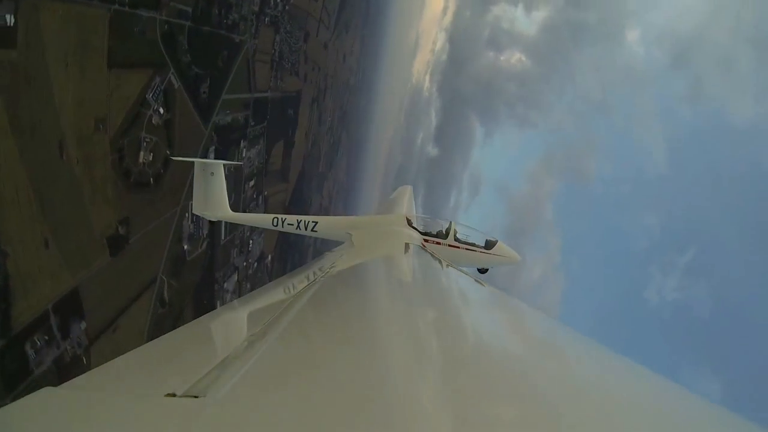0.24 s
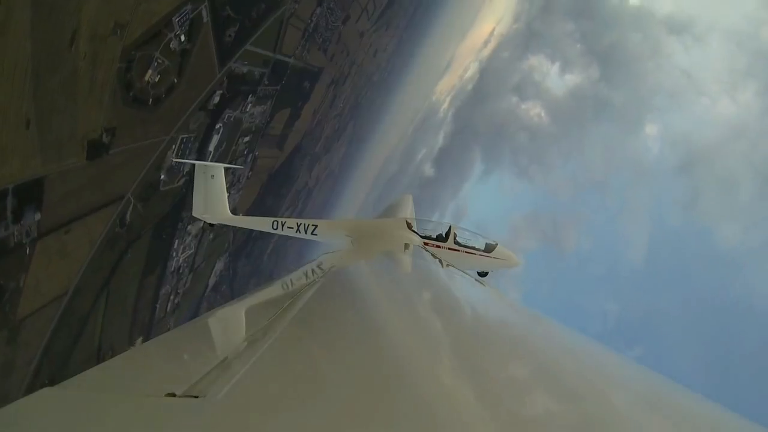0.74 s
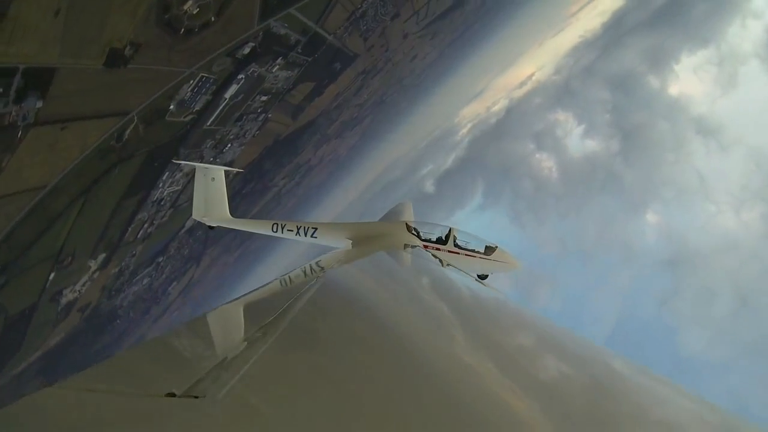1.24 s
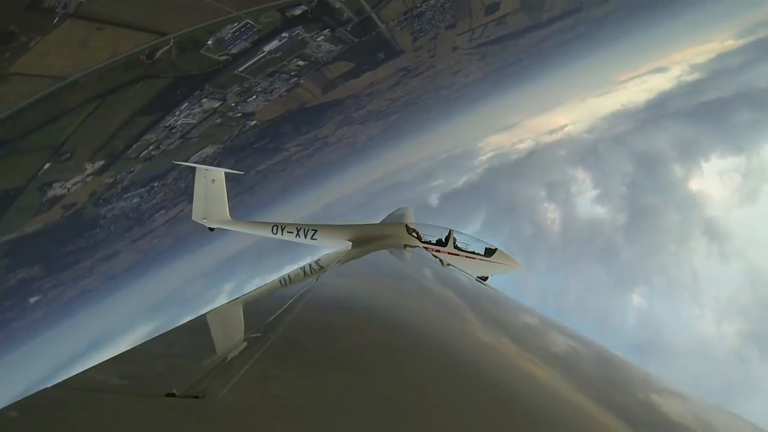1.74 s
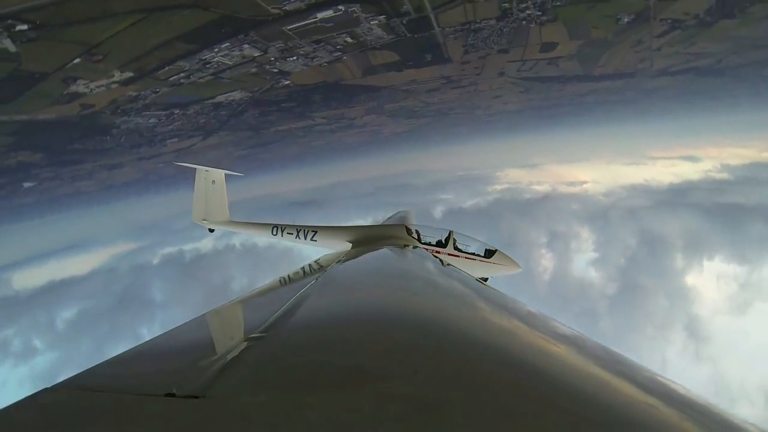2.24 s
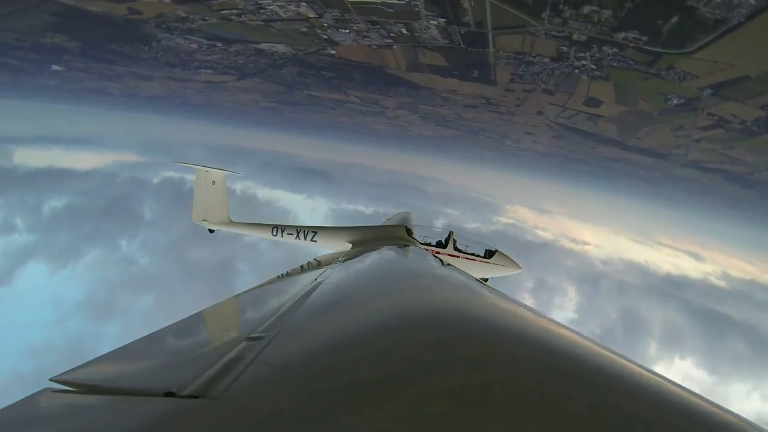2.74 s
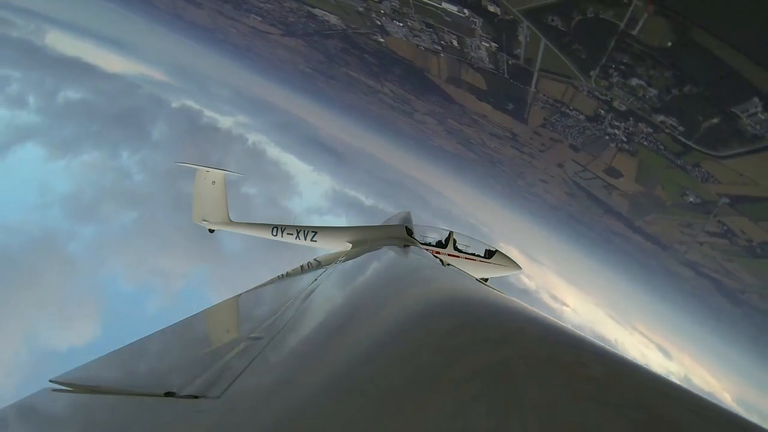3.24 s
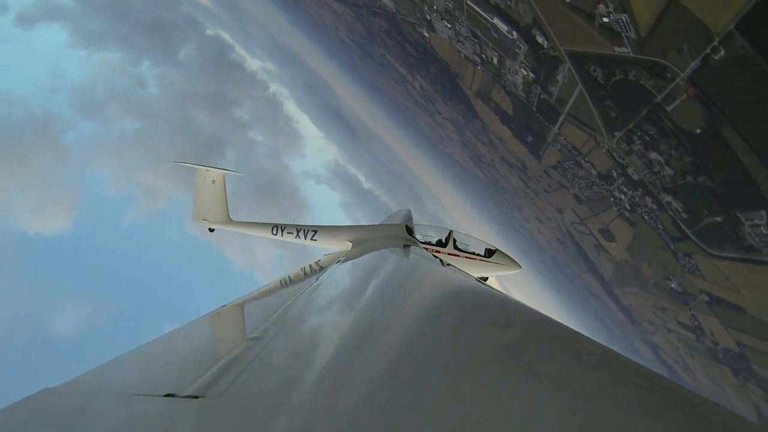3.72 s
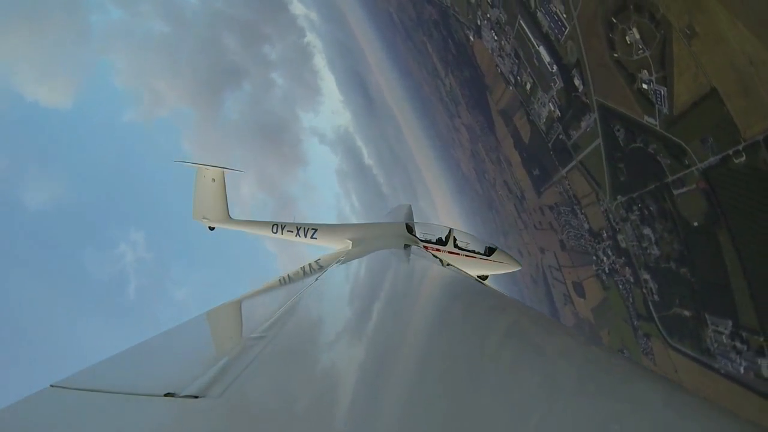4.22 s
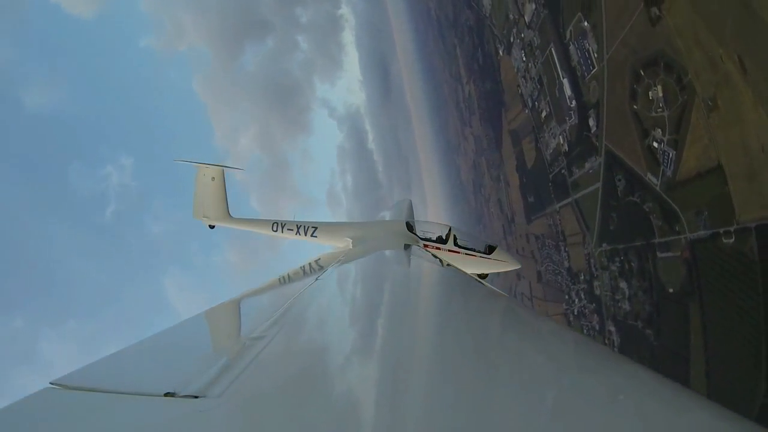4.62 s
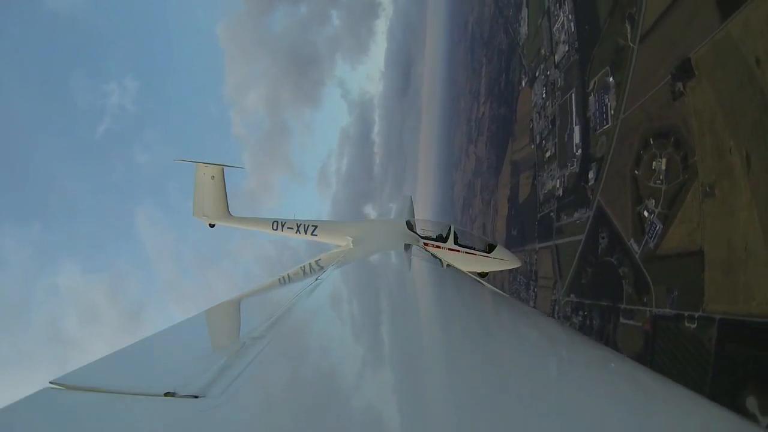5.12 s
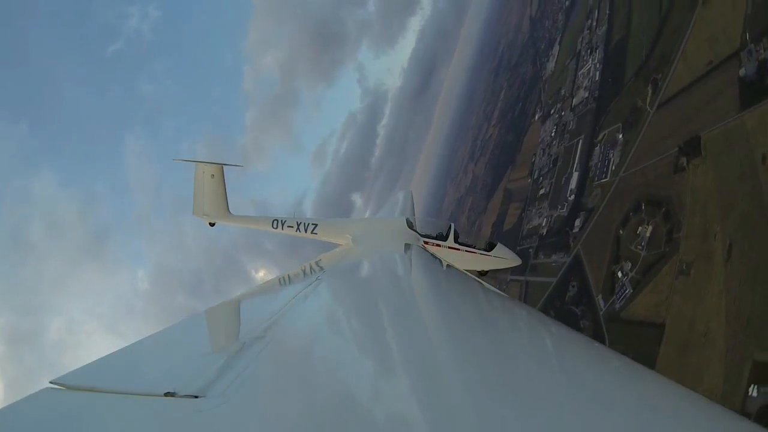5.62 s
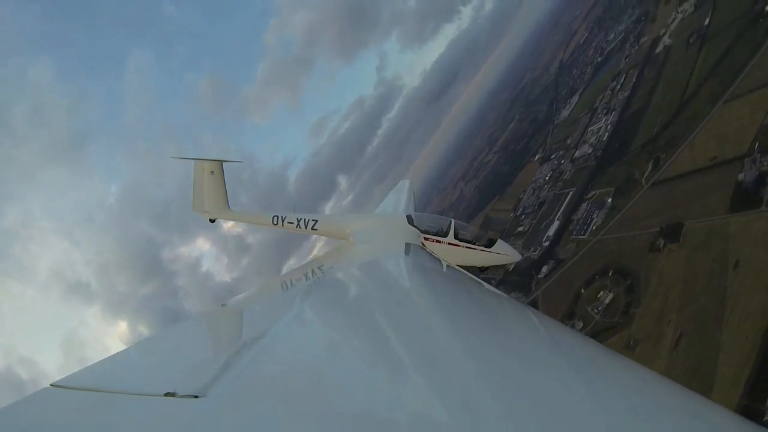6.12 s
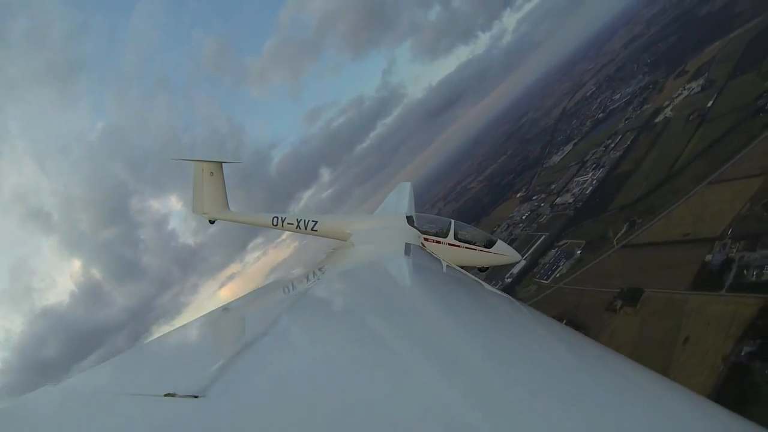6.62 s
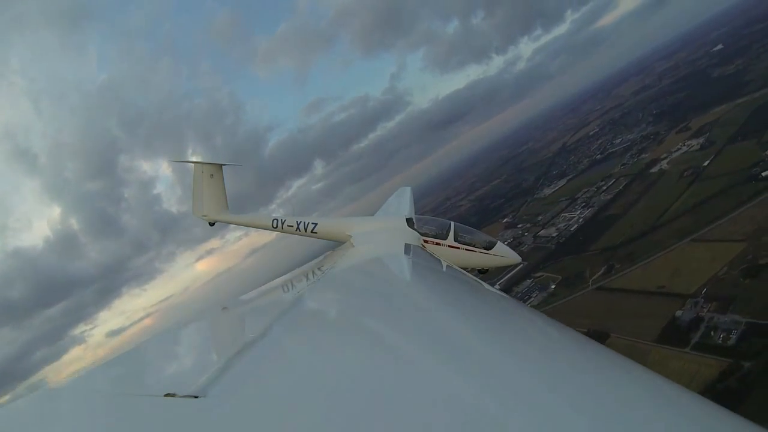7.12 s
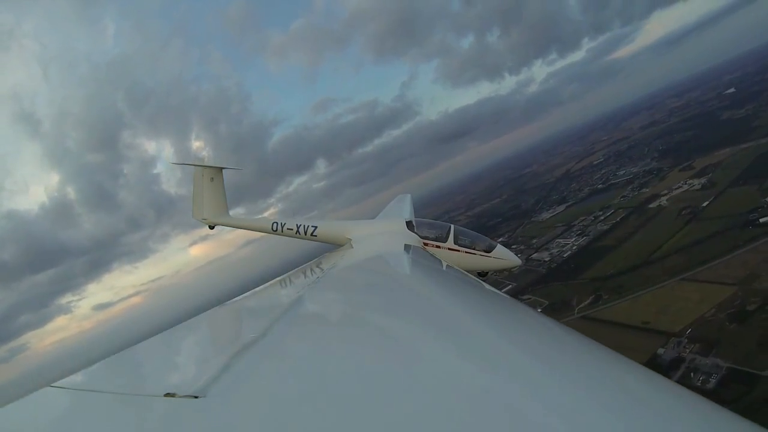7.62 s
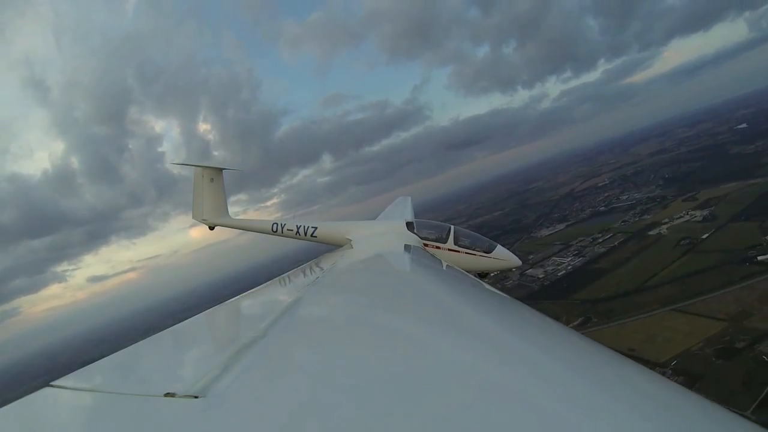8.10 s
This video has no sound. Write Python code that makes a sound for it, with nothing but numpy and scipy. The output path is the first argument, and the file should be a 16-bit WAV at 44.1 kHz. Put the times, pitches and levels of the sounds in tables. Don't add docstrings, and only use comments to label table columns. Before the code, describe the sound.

Close, mono, boxy airflow in open sky, with no engine and no room echo. A deep shuddering hum bumps unevenly beneath a muffled roar; a hollow, breathy mid tone thins early, then swells after four seconds. Bright hiss with very faint whistles dips around two seconds and grows fuller as the glider rolls level.

```python
import sys
import numpy as np
from scipy import signal
from scipy.fft import rfft, irfft, next_fast_len
from scipy.io import wavfile
from scipy.ndimage import map_coordinates

SR = 44100
rng = np.random.default_rng(int(sys.argv[2]) if len(sys.argv) > 2 else 0)


def how_loud(loudness_db):
    steps = np.asarray(loudness_db, float) / 20
    return 10 ** steps


def transcribe(u):
    v = np.clip(np.atleast_2d(u).T, -1, 1)
    q = np.round(v * 32767).astype(np.int16)
    wavfile.write(sys.argv[1], SR, q)


N = 368676

# rest level/dB, airspeed share/(dB per dB), sideslip share/(dB per dB)
LAYER_RULES = dict(first=(-25, -0.37, 0.25), second=(-31, -.2, 0.15), buffet=(-29.5, -0.23, 0.49),
               third=(-34.5, 0.25, 0.36), deep=(-30.5, 1.05, 0.09), roar=(-33.5, 0.65, 0.22),
               hiss=(-33, 1, 0.062), fine=(-48.5, 0.68, .3), thin=(-59, 0.64, .6))


def unit(x):
    return x / np.sqrt(np.mean(x ** 2) + 1e-20)


def along(points, hz):
    f, values = np.transpose(points)
    return np.interp(np.log(hz + 1), np.log(f + 1), values)


def curves(rows):
    times, *columns = np.transpose(rows)
    return [np.interp(np.arange(N) / SR, times, column) for column in columns]


def wobble(rate):
    knots = rng.standard_normal(400 + N // 100)
    return unit(map_coordinates(knots, [np.arange(N) * rate / SR]))


def peak(f, hz, width):
    damping = (f * width) ** 2
    return damping / ((hz * hz - f * f) ** 2 + damping)


def above(f, hz):
    return 1 / (1 + (hz / (f + 1)) ** 16)


def noise(power):
    m = next_fast_len(N + 8192)
    gain = np.sqrt(power(np.fft.rfftfreq(m, 1 / SR)))
    spectrum = rfft(rng.standard_normal(m)) * gain
    return unit(irfft(spectrum, m)[:N])


def level(rest_db, by_speed, by_slip, lead_s=0):
    # t/s, level/dB
    airspeed = [(0, 0.5), (.2, -1), (1.1, -3), (1.7, -6), (1.95, -3.5), (2.5, -5.5), (3.3, -4.5), (4, -0.5),
                (4.7, -0.5), (5.3, 2.5), (6.1, 3), (6.9, 4.5), (7.4, 4.5), (7.95, 4), (8.36, 5)]
    # t/s, level/dB
    sideslip = [(0, 3), (0.379, -1.5), (.6, 1.5), (1.35, 0), (1.7, -1.5), (2.3, -2), (2.7, -3.5), (3.3, -3),
                (3.7, 1.5), (4, 4), (4.501, 4.5), (4.8, 3.5), (5.3, 5), (5.65, 2), (6, 4), (7.3, 3),
                (8, 2.5), (8.36, 2)]
    speed_db = curves(airspeed)[0]
    slip_db = curves([(s - lead_s, db) for s, db in sideslip])[0]
    return rest_db + by_speed * speed_db + by_slip * slip_db


def whistles():
    # f/Hz, width/Hz, level/dB
    gaps = [(3730, 68, -54.5), (4580, 110, -56.5), (6550, 200, -56)]
    out = np.zeros(N)
    for hz, width, db in gaps:
        waver_db = 0.6 * wobble(3.82)
        out += how_loud(db + waver_db) * noise(lambda f: peak(f, hz, width) ** 1.5)
    return out


def hiss(eddies):
    # f/Hz, density/(dB per Hz)
    hiss_curve = [(900, -56), (1700, -0.5), (2100, -3), (2700, -3), (3500, -5), (4500, -13), (6200, -17.5),
                  (7000, -19), (9300, -26.5), (12000, -31.5), (16000, -37)]
    # f/Hz, width/Hz, level over the hiss/dB
    resonances = [(2345, 380, 5.5), (2923, 210, 9.5), (3230, 180, 1.5), (4140, 200, 3.5), (5094, 560, 10),
                  (5760, 460, 5.5), (7950, 630, 9.5), (10430, 1300, 11.5), (14700, 600, 3)]

    def shell(f):
        ringing = sum(how_loud(2 * db) * peak(f, hz, width) ** 1.43 for hz, width, db in resonances)
        return how_loud(2 * along(hiss_curve, f)) * (1 + ringing)

    main_db = level(*LAYER_RULES["hiss"]) + 0.36
    fine_db = level(*LAYER_RULES["fine"]) + 0.5
    thin_db = level(*LAYER_RULES["thin"]) + 1.5
    out = how_loud(main_db) * noise(lambda f: shell(f) * (1 - above(f, 6460)))
    out += how_loud(fine_db) * noise(lambda f: shell(f) * above(f, 6450) * (1 - above(f, 11500)))
    out += how_loud(thin_db) * noise(lambda f: shell(f) * above(f, 12100))
    return how_loud(0.57 * eddies) * out


def roar(eddies):
    # f/Hz, density/(dB per Hz)
    roar_curve = [(90, -18), (200, -4.5), (260, 1), (350, -1.5), (420, -5), (520, -9), (615, -3),
                  (750, -8.5), (860, -4), (1000, -8), (1200, -19.5), (1800, -44)]

    def dull(f):
        return how_loud(2 * along(roar_curve, f))

    deep_db = level(*LAYER_RULES["deep"])
    upper_db = level(*LAYER_RULES["roar"]) + 1.0
    out = how_loud(deep_db) * noise(lambda f: dull(f) * (1 - above(f, 550)))
    out += how_loud(upper_db) * noise(lambda f: dull(f) * above(f, 440))
    return how_loud(0.71 * eddies) * out


def cavity(eddies):
    # f/Hz, width/Hz, rest level/dB,
    # airspeed share/(dB per dB), sideslip share/(dB per dB), lead on the sideslip/s
    modes = [(1191.5, 117, -23, 0, 0.84, -0.094), (1302, 224, -23, -.1, 1, 0.13),
             (1514, 282, -24.5, 0.42, 0.87, 0.04), (1742, 330, -34, 0.65, 0.92, -.1)]
    out = np.zeros(N)
    for hz, width, *rule in modes:
        out += how_loud(level(*rule)) * noise(lambda f: peak(f, hz, width) ** 2)
    return how_loud(0.31 * eddies) * out


def swells(rows, idle_db):
    unsteady_db, unsteady_rate = 5.5, 13
    t = np.arange(0, N, 64) / SR
    bells = sum(how_loud(db) * np.exp(-0.5 * ((t - s) / half_s) ** 2) for s, db, half_s, *_ in rows)
    unsteadiness = np.abs(wobble(unsteady_rate)) - wobble(unsteady_rate / 2)
    collapse_db = unsteady_db * unsteadiness.clip(0)
    swing = np.interp(np.arange(N) / SR, t, bells) + how_loud(idle_db - collapse_db)
    return 20 * np.log10(swing)


def mount():
    # drift/Hz, width of the noisy part/Hz, noisy share of power (0-1)
    bending = [(1.4, 14, .03), (3.5, 22, .18), (5, 34, .9)]
    # f/Hz, density/(dB per Hz)
    buffet_curve = [(12, -24), (25, 0.5), (70, -0.5), (100, -6.5), (200, -6), (330, -25), (600, -62)]
    # t/s, level/dB, half length/s, f under that load/Hz
    jolts = [(0.22, -18.5, 0.015, 49.6), (0.36, -18, 0.019, 48.4), (0.78, -30, 0.017, 49.3),
             (0.83, -19, 0.14, 51.1), (1.15, -22.5, 0.06, 48.3), (1.34, -20, 0.022, 51.1),
             (1.49, -19.5, 0.13, 50), (1.77, -32, 0.11, 51.8), (2.08, -10, 0.039, 50.7),
             (2.22, -21, 0.025, 51.4), (2.38, -30, 0.023, 50.6), (2.61, -24, 0.02, 52.2),
             (2.7, -23.5, 0.12, 53.8), (3.1, -20.0, 0.02, 50.8), (3.33, -25.6, 0.12, 50.9),
             (3.72, -29, 0.11, 52.7), (3.79, -20, 0.021, 54.7), (4.46, -23.2, 0.1, 53.1),
             (4.63, -19, 0.019, 50.3), (4.83, -18, 0.025, 52.1), (5.16, -21.5, 0.092, 52.1),
             (5.4, -23.6, 0.025, 51.0), (5.68, -19.5, 0.11, 52.06), (5.92, -17, 0.034, 52.6),
             (6.12, -21, 0.045, 51.7), (6.78, -23, 0.021, 48.3), (6.97, -23, 0.037, 50.1),
             (7.3, -25, 0.045, 50.6), (7.51, -20, 0.026, 51.3), (7.94, -27, 0.058, 51)]
    # t/s, level/dB, half length/s
    shudders = [(0.07, -29.0, 0.035), (0.54, -30, 0.061), (1.26, -32, 0.023), (1.95, -33.5, 0.11),
                (2.01, -30.1, 0.022), (2.82, -27, 0.1), (3.05, -28, 0.025), (3.31, -36, 0.1),
                (3.55, -20, 0.041), (3.87, -30.6, 0.1), (4.18, -24.5, 0.025), (4.29, -27.5, 0.11),
                (4.58, -30, 0.13), (5.12, -32, 0.069), (6.43, -36, 0.088), (7.12, -41, 0.12),
                (7.66, -34.5, 0.11), (8.29, -27, 0.035)]

    first_hz = curves(jolts)[-1]
    first_db = swells(jolts, level(*LAYER_RULES["first"]))
    second_db = swells(shudders, level(*LAYER_RULES["second"]))
    third_db = level(*LAYER_RULES["third"])
    buffet_db = level(*LAYER_RULES["buffet"]) + 4.5

    out = how_loud(buffet_db) * noise(lambda f: how_loud(2 * along(buffet_curve, f)))
    motions = [(first_hz, first_db), (148, second_db), (186, third_db)]
    for (drift_hz, width, share), (hz, mode_db) in zip(bending, motions):
        phase = 2 * np.pi * np.cumsum(hz + drift_hz * wobble(9)) / SR
        swing = np.sqrt(2) * np.sin(phase)
        kicks = noise(lambda f: peak(f, np.mean(hz), width) ** 2)
        out += how_loud(mode_db) * (np.sqrt(1 - share) * swing + np.sqrt(share) * kicks)
    return out


def scene():
    eddies = 0.4 * wobble(13) + 0.9 * wobble(40) + 0.6 * wobble(200)
    mix = whistles() + hiss(eddies) + roar(eddies) + cavity(eddies) + mount()
    return mix[None]


def top_cut(x):
    return signal.sosfilt(signal.butter(12, 15280, fs=SR, output="sos"), x)


def record(dry):
    soft = dry / (1 + np.abs(dry) ** 7.7) ** (1 / 4.5)
    return top_cut(soft)


dry = scene()
out = record(dry)
transcribe(out)
```